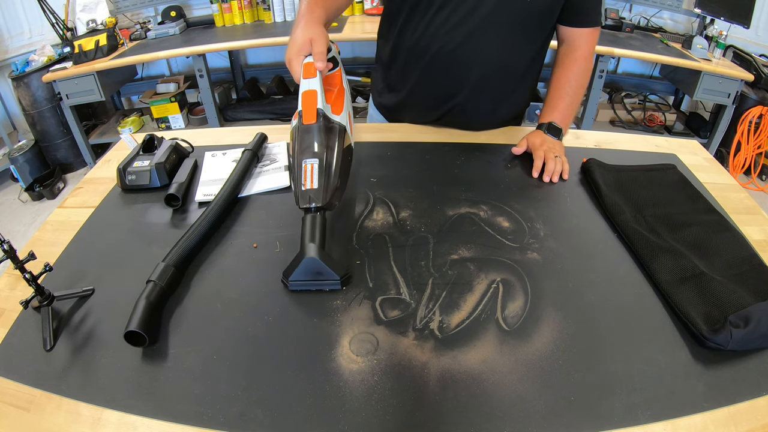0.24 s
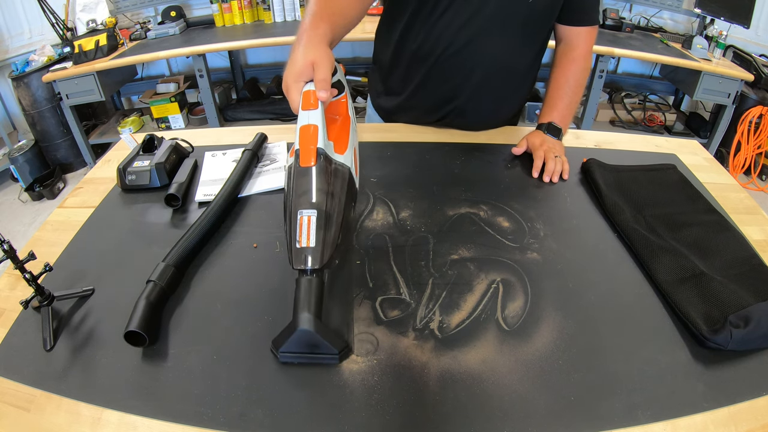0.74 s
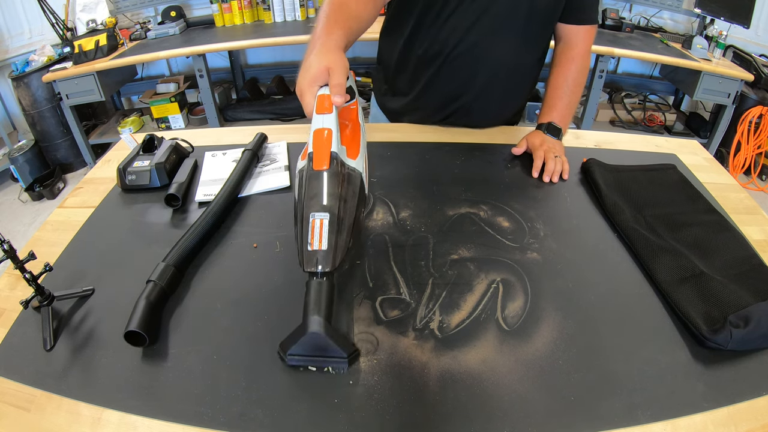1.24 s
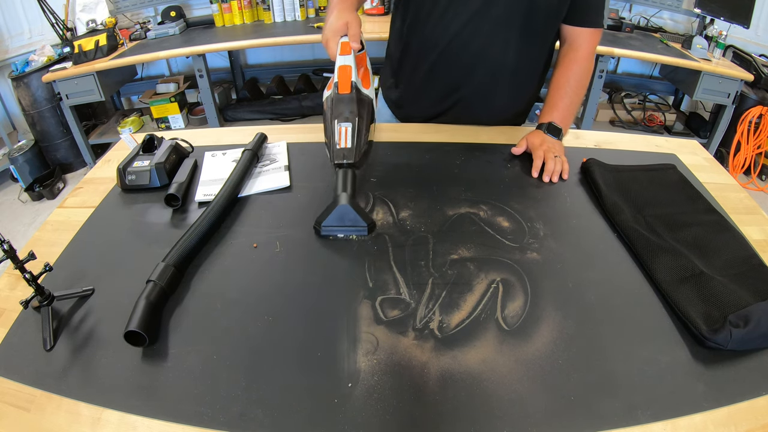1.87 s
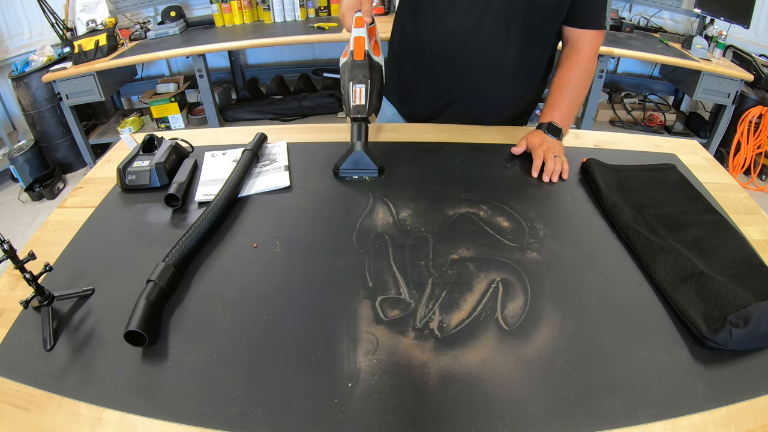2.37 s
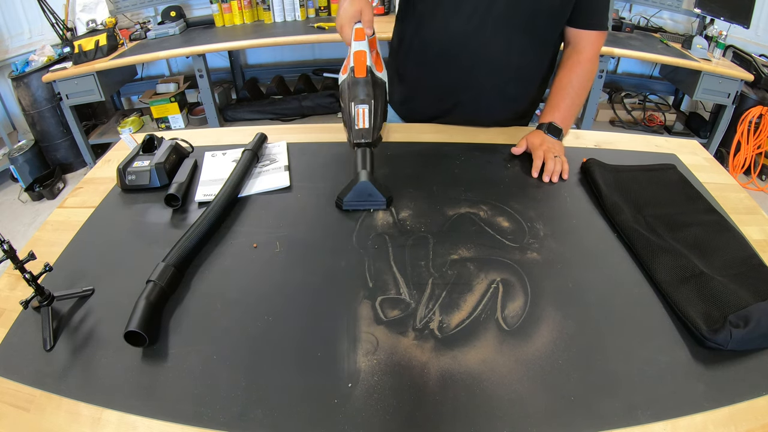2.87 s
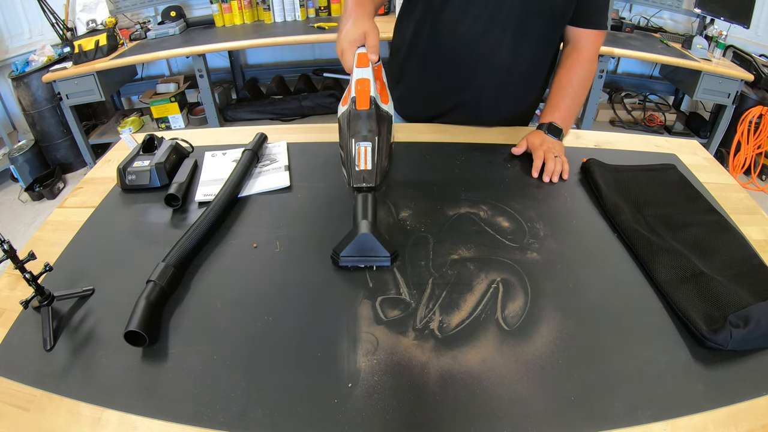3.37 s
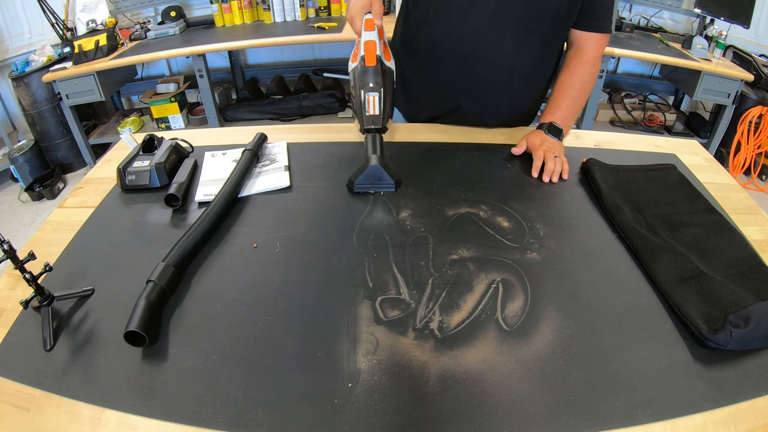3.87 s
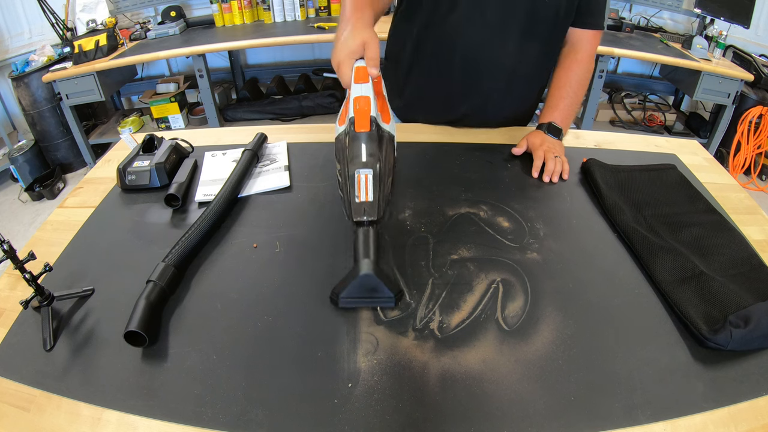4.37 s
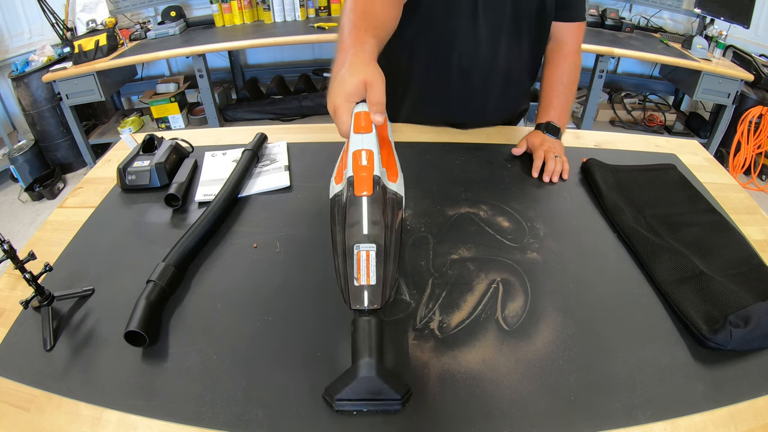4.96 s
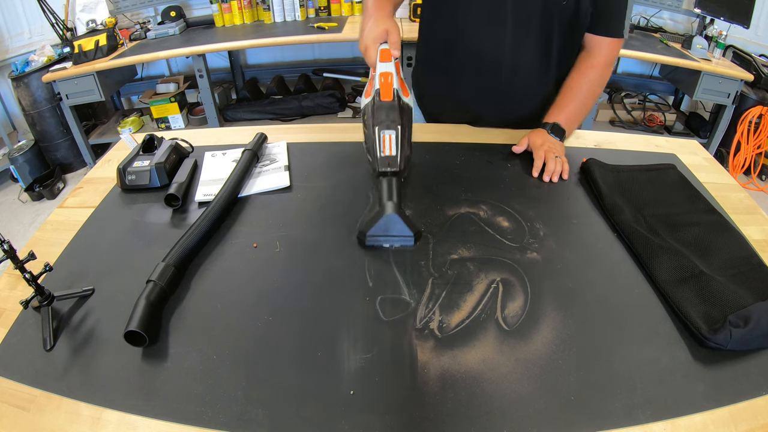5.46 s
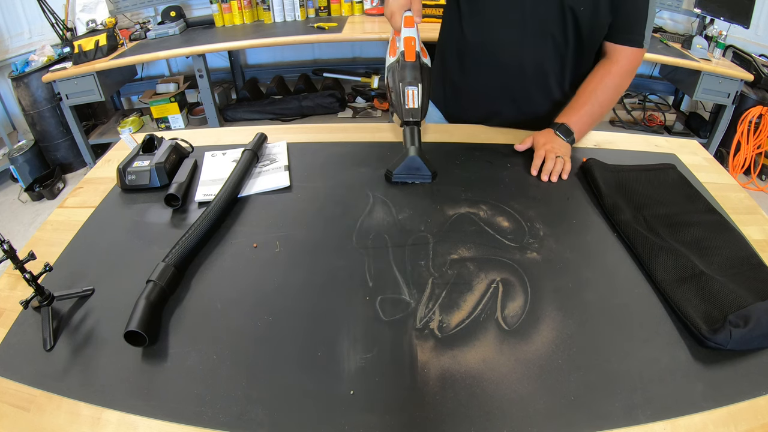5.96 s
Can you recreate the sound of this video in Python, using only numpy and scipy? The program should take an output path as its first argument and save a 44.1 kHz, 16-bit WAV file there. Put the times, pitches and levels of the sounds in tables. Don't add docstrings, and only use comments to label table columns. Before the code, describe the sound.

Close, constant whine of a battery vacuum, airy hiss swelling with each stroke, faint nozzle squeaks, and a low engine drone growing later.

```python
import sys
import numpy as np
from scipy import signal
from scipy.fft import rfft, irfft, next_fast_len
from scipy.io import wavfile
from scipy.ndimage import uniform_filter1d, map_coordinates

SR = 44100
rng = np.random.default_rng(int(sys.argv[2]) if len(sys.argv) > 2 else 0)


def attenuation_scalar(level_db):
    decades = np.asarray(level_db, float) / 20
    return 10 ** decades


def unload_wav(signal):
    wavfile.write(
        sys.argv[1],
        SR,
        np.round(np.clip(np.atleast_2d(signal).T, -1, 1) * 32767).astype(np.int16),
    )


N = 273861

# time in seconds, turns per second in Hz, rotor tone in dB.
ROTOR = [(0.0, 461.51, -23.9), (0.56, 466.3, -26.3), (1.08, 467.68, -29.1), (1.26, 469.32, -31.9),
         (1.42, 469.52, -28.8), (1.78, 468.63, -26.1), (2.45, 469.06, -25.0), (2.59, 469.6, -26.6),
         (2.72, 469.69, -24.8), (3.15, 469.6, -24.6), (3.55, 470.11, -26.1), (3.95, 470.17, -25.1),
         (4.34, 469.63, -24.6), (4.91, 469.51, -28.4), (5.05, 470.15, -31.3), (5.41, 470.52, -26.4),
         (5.61, 470.01, -26.7), (6.21, 470.68, -24.8)]
BLADE_MULTIPLES = (12, 22, 11)
# time in seconds, then the
# level in dB of the 12th, 22nd and 11th multiple.
BLADE_LEVELS = [(0.0, -40, -67, -53.5), (0.5, -45.5, -55.5, -54), (0.73, -59, -65, -64),
                (0.87, -55, -54, -55), (1.5, -61, -54, -54), (1.63, -48, -55, -48.5),
                (1.9, -41.5, -59, -54), (2.45, -41.5, -63, -53), (2.79, -39.5, -55.5, -53),
                (3.38, -51, -57, -57.5), (3.52, -43.5, -58, -58), (3.95, -39.5, -60, -53),
                (4.27, -48, -59, -57), (4.4, -49, -50, -55), (4.86, -56, -46, -55), (5.4, -53, -48, -52),
                (5.55, -37.5, -56, -51.5), (6.21, -43, -58, -52)]
# multiple, level in dB, then the change in dB per unit of reach, of turn and of tilt.
WEAK_MULTIPLES = [(2.0, -59.9, 2.8, -1.4, -1.1), (3.0, -51.2, 1.1, 1.0, 0.8), (4.0, -59.3, 3.6, -0.0, 0.3),
                  (6.0, -62.2, -0.2, 3.1, 1.4), (7.0, -59.1, 0.5, -1.2, -0.1), (9.0, -60.6, -4.0, 2.2, 0.1),
                  (13.0, -61.4, -0.3, -0.4, 0.2), (14.0, -62.1, 0.5, 2.3, -1.0),
                  (15.0, -61.0, 2.0, -1.5, -0.8), (16.0, -69.7, 1.4, 0.2, -0.1),
                  (19.0, -64.7, 2.4, 1.1, -0.7), (20.0, -60.6, -1.1, -1.8, 0.3),
                  (21.0, -61.4, -1.9, -0.3, -0.2), (23.0, -63.6, -0.3, -1.5, 0.7),
                  (24.0, -62.9, 0.2, 0.5, -0.2), (25.0, -71.7, 0.5, -0.3, -2.2),
                  (26.0, -69.4, 1.5, 0.7, 2.1), (27.0, -72.9, 1.6, 0.2, 0.7), (28.0, -75.1, 1.2, 0.6, 0.6),
                  (29.0, -66.3, 1.4, 1.1, 1.4), (30.0, -74.5, 2.7, -0.3, 1.7),
                  (31.0, -67.6, 2.0, 1.3, -0.4), (32.0, -78.9, -0.1, 1.5, 1.7),
                  (33.0, -78.3, 2.1, 2.5, 2.5)]


def motor():
    speed_hz, rotor_db = curves(ROTOR)
    shaft = 2 * np.pi * np.cumsum(speed_hz) / SR
    shaft = shaft + 0.013 * wobble(30)
    rotor_db = rotor_db + 0.4 * wobble(9.3) + 0.49 * wobble(30)
    x = tone(shaft + 0.08 * wobble(8), rotor_db)
    for multiple, db in zip(BLADE_MULTIPLES, curves(BLADE_LEVELS)):
        x += tone(multiple * shaft, db + glint_db(multiple) + 1.2 * wobble(25))
    levels = beamed(row[1:] for row in WEAK_MULTIPLES)
    for (multiple, *_), db in zip(WEAK_MULTIPLES, levels):
        unsteady_db = 2.2 if multiple > 3 else 1.2
        x += tone(multiple * shaft, db + 1.2 + glint_db(multiple) + unsteady_db * wobble(9))
    return x


# middle of the swell or dip in seconds, length in seconds, multiple, extra level in dB.
GLINTS = [(0.2, 1.3, 32.0, 12.6), (0.35, 0.9, 30.0, 13.4), (0.45, 0.9, 16.0, 9.1), (0.45, 1.3, 24.0, 9.5),
          (0.45, 1.3, 33.0, 13.0), (0.45, 1.8, 29.0, 8.7), (0.6, 1.3, 21.0, 9.2), (0.75, 0.4, 6.0, 12.1),
          (0.75, 0.6, 25.0, 10.7), (0.75, 0.9, 27.0, 10.2), (0.85, 0.6, 28.0, 14.0), (0.9, 0.4, 19.0, 15.2),
          (1.55, 0.4, 28.0, 15.5), (1.85, 1.8, 20.0, 5.6), (2.05, 0.6, 15.0, 10.6), (2.1, 1.3, 26.0, 8.1),
          (3.3, 0.6, 28.0, 13.4), (3.6, 0.6, 25.0, 10.3), (4.45, 0.4, 25.0, 11.5), (4.65, 0.6, 28.0, 14.6),
          (4.65, 1.3, 19.0, 7.7), (4.85, 1.8, 30.0, 8.9), (4.95, 0.4, 6.0, 11.0), (5.25, 0.4, 9.0, 10.3),
          (5.25, 0.4, 32.0, 16.8), (5.35, 0.4, 21.0, 10.6),
          (5.13, .5, 12, 9.5), (5.25, .5, 22, 3.5), (4.65, .2, 22, -4), (4.4, .25, 22, 2),
                (4.08, .25, 12, 2), (5.54, .14, 22, -9), (2.15, .3, 22, 8), (2.42, .3, 22, -6),
                (5.78, .3, 12, -3), (6.1, .3, 12, 1.5), (2.82, .3, 12, 1.5), (1.85, .2, 12, 2),
                (3.0, .3, 11, 4), (3.72, .3, 11, 5), (.12, .6, 24, 5), (0, .5, 29, 5), (.55, .4, 29, -3)]


def glint_db(multiple):
    t = np.linspace(0, N / SR, 1000)
    swells = np.zeros(1000)
    for middle, length, k, db in GLINTS:
        if k == multiple:
            swells += db * np.cos(np.pi * np.clip((t - middle) / length, -.5, .5)) ** 2
    return np.interp(np.arange(N) / SR, t, swells)


# time in seconds, then reach, turn, tilt and roll (no unit).
POSE = [(0.0, -0.58, 1.5, 0.2, 0.5), (0.53, 0.45, 0.6, 0.5, -1), (0.96, 1.36, -1.8, 0.2, 2),
        (1.19, 1.26, -1.4, -0.7, 2.5), (1.43, 1.1, 0.0, -0.1, -2.5), (1.66, 0.21, 0.9, -0.2, -1),
        (1.92, -0.71, 1.5, -0.8, -1), (2.52, -1.1, -2.6, 0, 0), (2.72, -0.92, 0, -0.5, 0.5),
        (3.49, -0.26, 1.45, 0.9, -1.5), (3.84, -0.93, -1, -1.1, -3), (4.18, -1.2, 0.9, 0.4, 1),
        (4.35, -0.073, -0.0, 1.5, -2.5), (4.81, 1.16, -1.6, -0.4, 2.5), (5.24, 1.2, 0.3, 0.3, -2.5),
        (5.61, -0.99, 1.7, -1, 0.5), (5.9, -0.6, -0.6, -1, -0.3), (6.21, -1, 1.5, 0, 1.2)]


def beamed(rows):
    pose = np.array(curves(POSE))
    return [db + np.dot(per_pose_db, pose[:len(per_pose_db)]) for db, *per_pose_db in rows]


# pitch in Hz, width in Hz.
TUBE = [(1760, 443), (2470, 255), (3150, 970), (4230, 650)]
# level in dB, then the change in dB per unit of reach, of turn, of tilt and of roll.
TUBE_LEVELS = [(-42.5, 2.5, 1, -0.023, 0.35), (-50, 2.5, -1.5, -0.2, -0.81), (-43.5, 0.5, 2, 0.2, 0.19),
               (-48, -0.5, 1.1, 0.3, -0.6)]
# start in seconds, end in seconds, pitch in Hz, width in Hz, level in dB.
SQUEAKS = [
    (3.4, 3.475, 4580, 280, -41),
    (3.45, 3.64, 4200, 260, -43),
    (1.82, 2.1, 4200, 240, -47),
    (4.42, 5, 8200, 400, -53),
    (4.93, 5.14, 9000, 600, -46),
    (5.0, 5.42, 2560, 200, -49),
    (3.74, 3.96, 2400, 200, -50),
    (5.5, 5.8, 4150, 300, -49),
]


def nozzle():
    x = np.zeros(N)
    for mode, db in zip(TUBE, beamed(TUBE_LEVELS)):
        x += attenuation_scalar(db) * air(resonant(*mode), patchy_db=0.4)
    t = np.arange(N) / SR
    attack_s, release_s = 0.02, 0.035
    for start, end, hz, width_hz, db in SQUEAKS:
        swell = np.clip(np.minimum((t - start) / attack_s, (end - t) / release_s), 0, 1)
        x += attenuation_scalar(db) * swell * unit(coloured(rng.standard_normal(N), resonant(hz, width_hz)))
    return x


# level in dB, then the change in dB per unit of reach, of turn, of tilt and of roll.
VENT_LEVELS = [
    (-47.0, 0.6, -0.29, -0.67, 0.38),
    (-46.5, -0.3, -0.056, -2.1, 0.026),
    (-46.0, 3, 0.21, -0.88, -0.32),
    (-50.0, 2.5, 0.54, -0.2, 0.2),
]
# pitch in Hz, level in dB per Hz.
ROAR = [(200, -29), (300, -6), (390, -1.5), (440, -2.5), (550, -3.5), (700, -9), (860, -6), (1000, -3.5),
        (1250, -8.5), (2200, -16), (3800, -14), (5000, -42), (7000, -44)]
RUSH = [(3500, -36), (4700, -3), (5200, -5), (5650, 1), (6200, -3.5), (6800, -4), (7500, -6.5),
        (8300, -11.5), (9500, -36)]
HISS = [(6500, -21), (7500, -1), (8300, -4), (9100, 4), (9700, 0), (10500, -1.5), (11200, 0.5),
        (12000, -23), (13000, -28)]
FIZZ = [(10500, -26), (11600, -0.5), (12500, -4), (13500, -6), (14500, -6), (15300, -13), (15850, -11),
        (16000, -72)]


def vents():
    x = np.zeros(N)
    extra_db = (3.5, 1.72, 2.75, 0.84)
    for shape, db, more_db in zip((ROAR, RUSH, HISS, FIZZ), beamed(VENT_LEVELS), extra_db):
        x += attenuation_scalar(db + more_db) * air(sloped(shape), patchy_db=1.98)
    return x


# time in seconds, level in dB of the 5th multiple, level in dB of the 8th.
ENGINE = [(0, -62, -51), (.9, -65, -60), (1.4, -68, -77), (2.4, -64, -49), (3.3, -67, -50),
          (3.55, -63, -63), (4.3, -55, -52), (4.78, -52, -64), (5.08, -46, -39), (6.21, -43, -42.5)]
# time in seconds, cycles per second in Hz.
ENGINE_RATE = [(0, 18.62), (.8, 18.48), (2, 18.2), (2.5, 17.9), (3.2, 17.78), (4, 17.62), (4.8, 17.5),
               (6.21, 17.28)]
# multiple, level in dB.
ENGINE_WEAK = [(4, -64), (7, -60), (7.5, -60), (9, -64), (10, -62), (11, -67), (13, -66)]


def engine():
    fifth_db, eighth_db = curves(ENGINE)
    cycle = 2 * np.pi * np.cumsum(curves(ENGINE_RATE)[0]) / SR
    x = tone(5 * cycle, fifth_db + 1.5 * wobble(6))
    x += tone(8 * cycle, eighth_db + 1.5 * wobble(5))
    for multiple, db in ENGINE_WEAK:
        x += tone(multiple * cycle, db + 3 * wobble(1.62))
    return x


# pitch in Hz, level in dB per Hz.
SHOP = [(15, -23), (24, -4), (40, -6), (55, -4.5), (110, -4.5), (200, -10), (280, -9.5), (400, -37)]


def shop_fan():
    t = np.arange(N) / SR
    hum_hz, drift_hz_per_s = 106.3, 0.38
    hum_db, fade_db_per_s = -44.5, 0.5
    turns = (hum_hz + drift_hz_per_s * t / 2) * t
    db = hum_db - fade_db_per_s * t + 0.8 * wobble(2.83) + 2.3 * wobble(7)
    hum = tone(2 * np.pi * turns + 0.12 * wobble(7.4), db)
    return hum + attenuation_scalar(-51.0) * air(sloped(SHOP), patchy_db=0.7)


def air(gain, patchy_db):
    z = signal.stft(rng.standard_normal(N), nperseg=512)[2]
    field = uniform_filter1d(rng.standard_normal(z.shape), size=5, axis=0)
    field = uniform_filter1d(field, size=40, axis=1)
    patchy = signal.istft(z * attenuation_scalar(patchy_db * unit(field)), nperseg=512)[1][:N]
    return unit(coloured(patchy, gain))


def coloured(x, gain):
    m = next_fast_len(N)
    return irfft(rfft(x, m) * gain(np.fft.rfftfreq(m, 1 / SR)), m)[:N]


def resonant(centre_hz, width_hz):
    return lambda hz: 1 / (1 + ((hz - centre_hz) / width_hz) ** 2 * 2)


def sloped(points):
    f, db = np.transpose(points)
    return lambda hz: attenuation_scalar(np.interp(np.log(hz + 1), np.log(f), db, -120, -120))


def tone(phase, db):
    return np.sqrt(2) * attenuation_scalar(db) * np.sin(phase + rng.uniform(0, 2 * np.pi))


def wobble(rate):
    at = np.arange(0, N + 64, 64)
    knots = rng.standard_normal(int(N * rate / SR) + 4)
    return np.interp(np.arange(N), at, map_coordinates(knots, [at * rate / SR]))


def curves(rows):
    s, *columns = np.transpose(rows)
    return [np.interp(np.arange(N) / SR, s, column) for column in columns]


def unit(x):
    return x / np.sqrt(np.mean(x ** 2) + 1e-20)


def scene():
    mono = motor() + nozzle() + vents() + engine() + shop_fan()
    return np.array([mono, mono])


def band_limit(x):
    return signal.sosfilt(signal.butter(12, 15970, fs=SR, output="sos"), x)


# start in seconds, end in seconds.
SPLITS = [(0, .1), (.28, .6), (.72, .93), (1.05, 1.22), (2.29, 2.35), (2.48, 2.68), (3.02, 3.22),
          (3.32, 3.35), (3.48, 3.54), (5.23, 5.33), (5.57, 5.62)]
# time in seconds, middle of the band in Hz.
SPLIT_BANDS = [(.09, 12200), (.5, 8100), (.62, 7600), (1.035, 7600), (1.34, 11000), (1.8, 7600),
               (4.17, 11000), (4.33, 6300), (5.61, 8600)]


def record(dry):
    mid = dry.mean(axis=0)
    hz, t, z = signal.stft(mid, SR, nperseg=1024)
    hz_column = hz[:, None]

    level = uniform_filter1d(np.minimum(abs(z), attenuation_scalar(-67.0)), size=24, axis=0)
    field = uniform_filter1d(rng.standard_normal(z.shape), size=16, axis=0)
    apart = sum((t > start) & (t < end) for start, end in SPLITS)
    share = attenuation_scalar(-13 + 4 * (hz_column < 300)) * (hz_column < 15000) * apart
    share = share * (unit(field) > -.15)
    for s, centre_hz in SPLIT_BANDS:
        share += attenuation_scalar(-3) * np.outer(abs(hz - centre_hz) < 700, abs(t - s) < .018)
    grain = signal.stft(rng.standard_normal(N), SR, nperseg=1024)[2]
    side = signal.istft(grain / abs(grain).mean() * level * share, SR, nperseg=1024)[1][:N]

    cell = uniform_filter1d(uniform_filter1d(abs(z), size=8, axis=0), size=3, axis=1)
    weak = cell < .52 * np.median(cell, axis=1, keepdims=True)
    dropped = (hz_column > 12600) & weak
    mid = signal.istft(z * ~dropped * (hz_column < 15820), SR, nperseg=1024)[1][:N]
    return band_limit(np.array([mid + side, mid - side]))


dry = scene()
out = record(dry)
unload_wav(out)
```